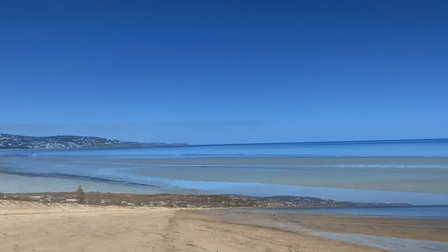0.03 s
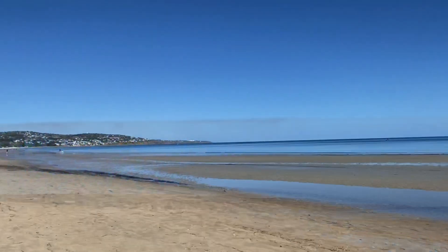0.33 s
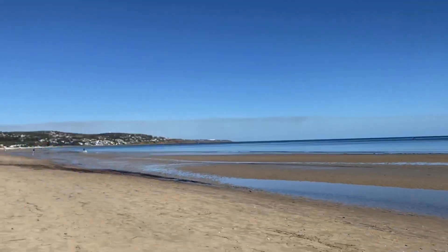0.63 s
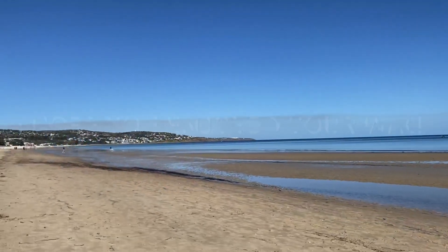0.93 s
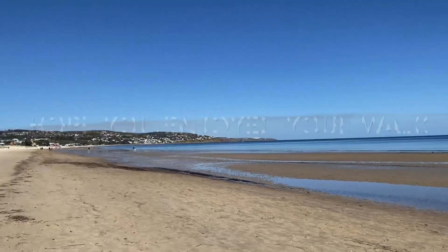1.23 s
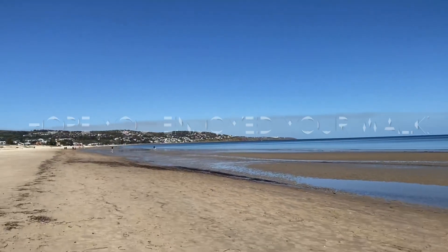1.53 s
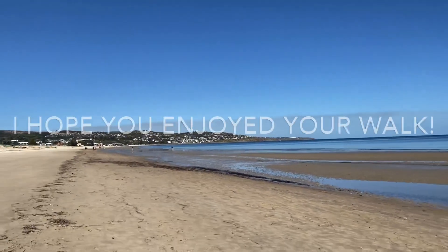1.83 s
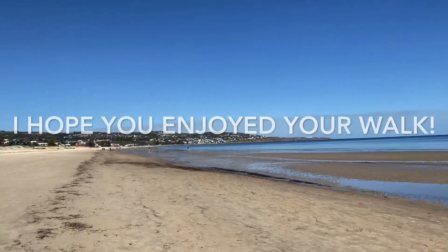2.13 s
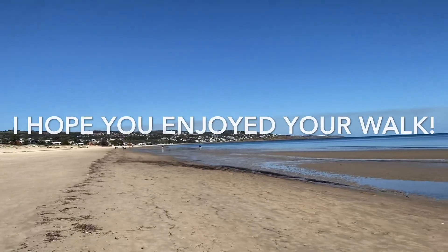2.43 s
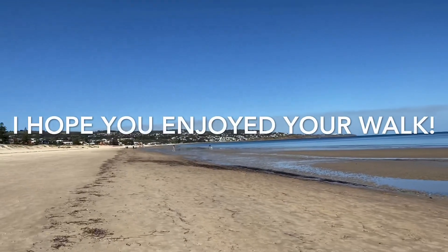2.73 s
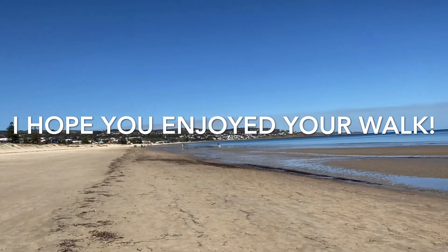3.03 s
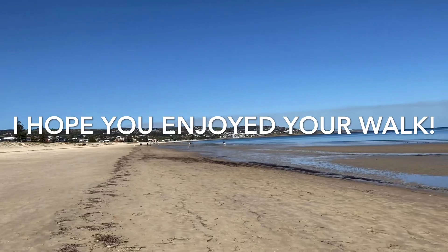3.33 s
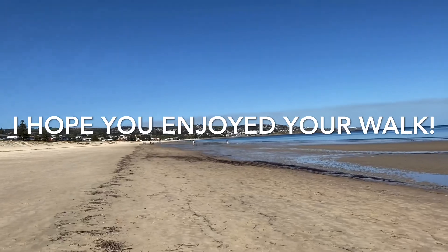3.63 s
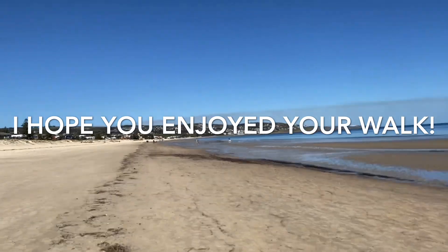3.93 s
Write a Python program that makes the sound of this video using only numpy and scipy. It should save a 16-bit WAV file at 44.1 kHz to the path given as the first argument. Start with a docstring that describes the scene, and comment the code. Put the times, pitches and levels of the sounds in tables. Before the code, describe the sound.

Someone walks steadily along a sandy beach, each close step a short, gritty crunch, with one sharp snap near the start. Soft wind brushes the microphone over far surf, a low rumble and a faint sinking drone.

```python
"""Footsteps on firm beach sand

Someone walks at about two steps a second, holding a phone. Heel and sole crush the sand in short
crunches, loose grains hiss, weight lands in dull thuds, and now and then something brittle snaps.
Behind are distant surf, soft wind on the microphone, a far-off rumble and a slowly sinking drone."""
import sys
import numpy as np
from scipy import signal
from scipy.fft import rfft, irfft
from scipy.io import wavfile
from scipy.ndimage import map_coordinates

SR = 44100
rng = np.random.default_rng(int(sys.argv[2]) if len(sys.argv) > 2 else 0)


def dump_mix(stems):
    """Bounce the given channels to the path in sys.argv[1] as a 16-bit WAV at rate SR."""
    frames = np.atleast_2d(stems).T  # one column per channel
    limited = np.clip(frames, -1, 1)  # hard clip at full scale
    pcm = np.round(limited * 32767).astype(np.int16)
    wavfile.write(sys.argv[1], SR, pcm)


N = 176400

# the background mix: time_s, surf_db, rumble_db, wind_db
BACKGROUND_LEVELS = [(0, -60.5, -66.5, -60), (.3, -56, -61.5, -61), (.55, -55, -51, -54),
                     (.8, -53, -58.5, -56.5), (1.05, -55.5, -52, -66), (1.35, -52.5, -48, -58),
                     (1.7, -54.5, -46, -49), (2.4, -57, -45, -47), (2.55, -56, -45.5, -67),
                     (3.05, -57.5, -45.5, -45), (3.5, -56, -45.5, -48.5), (4, -57, -45, -46)]
# the drone's downward glide: time_s, pitch_hz, level_db
DRONE_GLIDE = [(0, 169.5, -69.5), (1.2, 158.5, -66), (1.7, 153.7, -49), (2.4, 146.3, -49),
               (4, 128.5, -56.5)]
# faint high hiss between the steps: time_s, level_db
AIR_LEVELS = [(0, -79.5), (.3, -82), (.5, -74), (1.3, -76), (2.02, -74.5), (2.25, -81), (2.5, -77.5),
              (2.75, -73.5), (2.93, -80), (3.45, -81), (3.53, -76)]
# the walker's weight landing and shifting: start_s, peak_db, pitch_hz
THUD_HITS = [(.592, -38, 117), (0.686, -39.5, 109), (1.264, -36, 121), (2.351, -33.5, 101.1),
             (2.423, -38, 109.2), (3.139, -35, 74.6), (3.303, -35.5, 89.9)]
# bits of shell or dry weed breaking: start_s, peak_db, pitch_hz
SNAP_HITS = [(.377, -18, 1026), (.3927, -32.5, 1340), (.7645, -37.5, 1650), (.871, -36, 1530),
             (1.767, -38.5, 791.4), (2.3515, -33.5, 720), (3.205, -41, 1700)]
# the shoe first biting into the sand: start_s, level_db
BITE_HITS = [(.338, -65), (.684, -62.5), (0.732, -61), (.821, -62), (0.875, -59.5), (1.757, -65),
             (1.782, -65), (1.805, -69), (2.204, -59), (3.13, -68), (3.324, -58), (3.635, -64)]
# heel and sole pressing the sand: peak_s, rise_s, fall_s, crunch_db, hiss_db, pitch_hz
SHOE_PRESSES = [ (0.34, 0.0041, 0.074, -61, -58.5, 1852), (.41, 0.04, 0.083, -53.5, -66, 1999),
                (0.736, 0.015, 0.024, -58, -59.5, 1951), (.778, 0.0087, 0.01, -51.5, -57.5, 1850),
                (.826, 0.0078, 0.015, -56, -58, 1941), (0.873, 0.0028, 0.014, -49, -62, 1754),
                (0.88, 0.042, 0.05, -56, -62, 1801), (1.356, 0.02, 0.029, -56.5, -63.5, 1250),
                (1.407, 0.031, 0.035, -51, -60.5, 1803), (1.748, 0.0017, 0.0033, -45, -64, 1747),
                (1.761, 0.0028, 0.011, -44, -66, 1747), (1.786, 0.0058, 0.0048, -46.5, -64, 1892),
                (1.854, 0.0443, 0.061, -53.5, -64, 1801), (2.171, 0.012, 0.045, -55, -60.5, 1803),
                (2.206, 0.016, 0.017, -46.5, -54, 1606), (2.347, 0.035, 0.055, -52.5, -62, 1854),
                (2.78, .06, 0.042, -65.5, -74, 1598), (2.828, 0.028, 0.052, -51.5, -66, 1420),
                (3.139, 0.008, 0.026, -61, -60.5, 1944), (3.184, 0.01, 0.016, -53, -58, 1842),
                (3.264, 0.004, 0.026, -59, -64, 1848), (3.329, 0.0067, 0.0098, -45, -54.5, 1850),
                (3.334, 0.048, 0.05, -53, -62, 1898), (3.639, 0.012, 0.12, -62.5, -68, 1859),
                (3.76, 0.015, 0.024, -55, -60, 1894), (3.838, 0.054, 0.049, -54, -65, 1859)]

# the tone colour of each layer: frequency_hz, relative_db
SURF_EQ = [(100, -3.5), (300, 3.5), (550, 2.5), (1380, -5.5), (1490, -1.5), (1600, -4), (2400, -9),
           (3000, -14.5), (4000, -27), (16000, -62.5)]
RUMBLE_EQ = [(25, -27.5), (60, 1), (90, -4.5), (130, 0.5), (180, -8.5), (250, -11.5), (350, -23),
             (16000, -120)]
WIND_EQ = [(15, -52), (45, 0), (60, 10.5), (90, 6), (140, -4.5), (250, -22.5), (16000, -130)]
AIR_EQ = [(2000, -12), (4000, -4), (6800, -3), (8500, -13), (12000, -27.5), (15000, -28)]
THUD_RISE_S = 0.0045
SNAP_EQ = [(100, -50), (600, -6), (1000, -1), (1350, -9.5), (2300, -16), (3200, -28), (4500, -27.5),
           (6700, -33.5), (8200, -57), (15000, -69)]
BITE_EQ = [(1500, -15), (4000, -11), (7000, 1), (11000, 0), (15000, -2.5)]
HISS_EQ = [(1500, -23), (3000, 11.5), (4500, 3.5), (6800, 6.5), (8500, 0), (10500, -3.5), (12500, -10.5),
           (14500, -4.5)]
SCRUNCH_EQ = [(150, -19.5), (400, -10), (1150, -4), (1600, -3), (2500, -22), (16000, -73)]
CRUNCH_EQ = [(400, -14), (1100, -7.5), (1850, 3), (2700, -6.5), (3400, -10), (4300, -24), (16000, -50)]

# stereo image at the two microphone ports: frequency_hz, likeness_0_to_1, left_lead_rad, left_louder_db
FAR_IMAGE = [(56.6, 0.17, -6.5, -2), (128, 0.78, -0.1, -5), (255, 0.81, .7, -0.5), (586, 0.29, 0, 1),
             (1370, 0.042, -0.5, -1), (2120, 0.88, -0.5, -2.5), (3220, .55, 2.1, -1.5), (5950, 0.23, 5, 6)]
WIND_IMAGE = [(100, 0.86, 0, 0.38)]
FEET_IMAGE = [(300, 0.74, 0.37, 1), (900, 0.53, 0.09, -5.5), (1780, 0.96, 0.096, -3),
              (2950, 0.7, 1.1, -3.5), (4720, 0.29, 4, 5.5), (7300, 0.5, 4.35, -0.5), (9800, 1, 5.17, -1),
              (15600, 0.88, 14.7, 0.5)]

BITE_FALL_S = 0.014
PRESS_SHAPE = 2.24  # 1 = pointed, 2 = bell-shaped
SCRUNCH_DB, SCRUNCH_LEAD = -2, 0.3  # level against the crunch; early by this share of the rise time
TRICKLE_DB, TRICKLE_FALL_S = -9.5, 0.06  # kicked-up sand falling back after each press
JERK_RATE_HZ, JERK_DB = 190, 1.8  # the sand yields unevenly under the load


def undb(db):
    """Decibels to gain."""
    return 10 ** (np.asarray(db) / 20)


def unit(x):
    """Scale to rms 1."""
    return x / np.sqrt(np.mean(x ** 2))


def over_time(table):
    """The columns of an automation curve, one value per sample."""
    rows = np.array(table, float)
    return [np.interp(np.arange(N) / SR, rows[:, 0], col) for col in rows.T[1:]]


def over_pitch(table, stretch=1):
    """The columns of a spectrum, one value per frequency bin."""
    rows = np.array(table, float)
    hz = np.maximum(np.fft.rfftfreq(N, 1 / SR), 1)
    return [np.interp(np.log(hz), np.log(rows[:, 0] * stretch), col) for col in rows.T[1:]]


def peak_hz(eq):
    """Frequency of an EQ curve's highest point."""
    return max(eq, key=lambda point: point[1])[0]


def response(eq, stretch=1):
    """Minimum-phase response of an EQ curve: it rings only after the hit."""
    cepstrum = irfft(np.log(undb(over_pitch(eq, stretch)[0])), N)
    cepstrum[1:N // 2] *= 2
    cepstrum[N // 2 + 1:] = 0
    return np.exp(rfft(cepstrum))


def coloured(pair, eq):
    """Two signals through an EQ curve; rms 1."""
    return unit(irfft(rfft(pair) * response(eq), N))


def stereo(mid, side, image):
    """Left and right at the microphone ports, which hear the side signal in opposite sign."""
    alike, lead_rad, tilt_db = over_pitch(image)
    alike = np.clip(alike, 0, 1)
    sign = np.array([[1], [-1]])
    both = rfft(mid) * np.sqrt((1 + alike) / 2) + sign * rfft(side) * np.sqrt((1 - alike) / 2)
    return irfft(both * undb(sign * tilt_db / 2) * np.exp(sign * 1j * lead_rad / 2), N)


def texture(pair, eq, image):
    """Two unrelated signals, coloured and spread in stereo; rms 1."""
    return unit(stereo(*coloured(pair, eq), image))


def noise():
    """Two unrelated white noises."""
    return rng.standard_normal((2, N))


def wobble(rate_hz):
    """Smooth random modulation with bandwidth rate_hz; rms 1."""
    hz = np.fft.rfftfreq(N, 1 / SR)
    lowpass = np.exp(-(hz / rate_hz) ** 2) * (hz > 0)
    return unit(irfft(rfft(rng.standard_normal(N)) * lowpass, N))


def grains(per_s, scatter_db):
    """Two streams of tiny clicks, most weak and a few strong."""
    size = undb(scatter_db * np.minimum(rng.exponential(size=(2, N)), 6))
    return (rng.random((2, N)) < per_s / SR) * np.sign(noise()) * size


def surf(level_db, flicker_db=0.7):
    """Far surf: an even wash with a slight flicker."""
    return texture(noise(), SURF_EQ, FAR_IMAGE) * undb(level_db + flicker_db * wobble(rate_hz=23))


def rumble(level_db, flutter_db=1.2):
    """A low, fluttering rumble from far off."""
    return texture(noise(), RUMBLE_EQ, FAR_IMAGE) * undb(level_db + flutter_db * wobble(rate_hz=18))


def wind(level_db, gust_db=1.6):
    """Soft gusts buffet the microphone ports."""
    return texture(noise(), WIND_EQ, WIND_IMAGE) * undb(level_db + gust_db * wobble(rate_hz=5.8))


def drone(width_hz=20, left_lead_rad=0.33):
    """A narrow, unsteady drone that sinks in pitch, perhaps a far aircraft."""
    pitch_hz, level_db = over_time(DRONE_GLIDE)
    waver = wobble(width_hz) + 1j * wobble(width_hz)
    phase = 2 * np.pi * np.cumsum(pitch_hz) / SR + np.array([[left_lead_rad], [0]])
    return undb(level_db) * np.real(waver * np.exp(1j * phase))


def air():
    """A faint, uneven high hiss."""
    return texture(noise(), AIR_EQ, FAR_IMAGE) * undb(over_time(AIR_LEVELS)[0])


def thuds():
    """The walker's weight lands in dull bumps of two or three heavily damped low cycles."""
    out = np.zeros(N)
    for start_s, peak_db, pitch_hz in THUD_HITS:
        age_s = np.maximum(np.arange(N) / SR - start_s, 0)
        envelope = age_s / THUD_RISE_S * np.exp(1 - age_s / THUD_RISE_S)
        out += undb(peak_db) * envelope * np.sin(2 * np.pi * pitch_hz * age_s)
    return out


def snaps():
    """Shell or dry weed breaks in one sharp click, damped by the sand within milliseconds."""
    out = np.zeros(N)
    for start_s, peak_db, pitch_hz in SNAP_HITS:
        click = irfft(response(SNAP_EQ, pitch_hz / peak_hz(SNAP_EQ)), N)
        start = int(start_s * SR)
        out[start:] += undb(peak_db) * click[:N - start] / np.abs(click).max()
    return stereo(out, np.zeros(N), FEET_IMAGE)


def bites():
    """Coarse grains crack in short, bright sprays as the shoe first bites."""
    t = np.arange(N) / SR
    bursts = sum(undb(level_db) * (t >= start_s) * np.exp(-np.abs(t - start_s) / BITE_FALL_S)
                 for start_s, level_db in BITE_HITS)
    return bursts * texture(grains(per_s=650, scatter_db=2.4), BITE_EQ, FEET_IMAGE)


def press_power(levels_db, lead=0):
    """Power envelopes, one row per shoe press: a swell and a fall around its peak."""
    t = np.arange(N) / SR
    power = np.zeros((len(SHOE_PRESSES), N))
    for row, (peak_s, rise_s, fall_s, *_), level_db in zip(power, SHOE_PRESSES, levels_db):
        since_s = t - peak_s + lead * rise_s
        away = np.maximum(-since_s / rise_s, since_s / fall_s)
        near = away < np.pi
        row[near] = (undb(level_db) * np.exp(-away[near] ** PRESS_SHAPE)) ** 2
    return power + np.finfo(float).eps


def loose_sand(levels_db):
    """Loose grains hiss under each press, then trickle back in a soft tail."""
    power = press_power(levels_db).sum(axis=0)
    decay = np.exp(-1 / (TRICKLE_FALL_S * SR))
    trickle = undb(TRICKLE_DB) ** 2 * signal.lfilter([1 - decay], [1, -decay], power)
    hiss = texture(grains(per_s=13000, scatter_db=2), HISS_EQ, FEET_IMAGE)
    return np.sqrt(power + trickle) * hiss


def crushed_sand(eq, stretch):
    """Grains crushed under the shoe; their resonances slide by the factor stretch."""
    crackle = coloured(grains(per_s=5000, scatter_db=3), eq)
    playhead = np.cumsum(stretch)
    mid, side = (map_coordinates(stream, [playhead], mode="mirror") for stream in crackle)
    return unit(stereo(mid, side, FEET_IMAGE))


def footsteps():
    """Sand gives in small jerks: a deep scrunch, then a brighter crunch as it packs, with hiss on top."""
    *_, crunch_db, hiss_db, pitch_hz = np.array(SHOE_PRESSES).T
    deep_power = press_power(crunch_db + SCRUNCH_DB, lead=SCRUNCH_LEAD).sum(axis=0)
    presses = press_power(crunch_db)
    bright_power = presses.sum(axis=0)
    stretch = pitch_hz @ presses / bright_power / peak_hz(CRUNCH_EQ)  # the strongest press leads
    jerks = unit(undb(JERK_DB * wobble(JERK_RATE_HZ)))
    scrunch = np.sqrt(deep_power) * crushed_sand(SCRUNCH_EQ, stretch)
    crunch = np.sqrt(bright_power) * crushed_sand(CRUNCH_EQ, stretch)
    return jerks * (scrunch + crunch + loose_sand(hiss_db))


def scene():
    """The walker up close, over the bed of the open beach."""
    surf_db, rumble_db, wind_db = over_time(BACKGROUND_LEVELS)
    walker = footsteps() + bites() + snaps() + thuds()
    return walker + surf(surf_db) + rumble(rumble_db) + wind(wind_db) + drone() + air()


def record(dry, top_hz=15800):
    """The phone cuts the top end steeply."""
    return signal.sosfilt(signal.ellip(8, 0.2, 70, top_hz, fs=SR, output="sos"), dry)


dry = scene()
out = record(dry)
dump_mix(out)
```